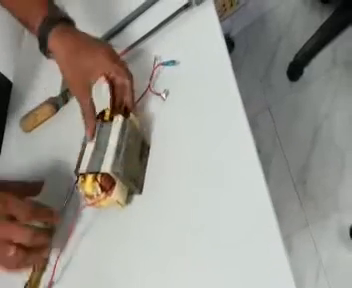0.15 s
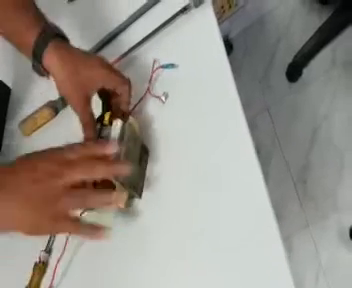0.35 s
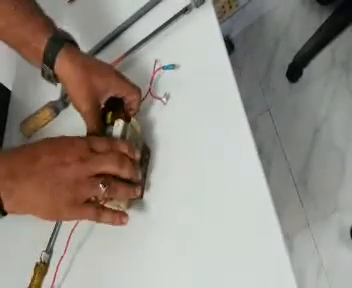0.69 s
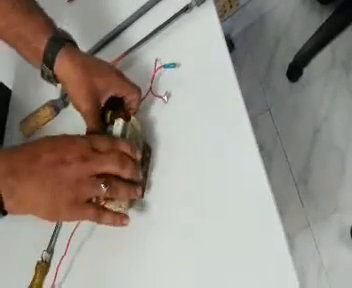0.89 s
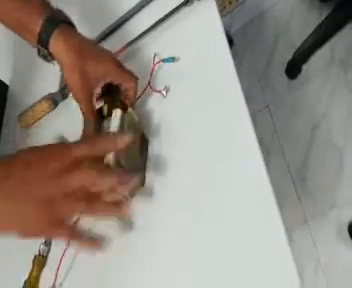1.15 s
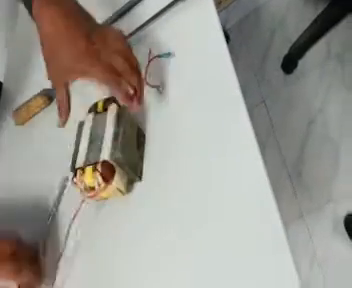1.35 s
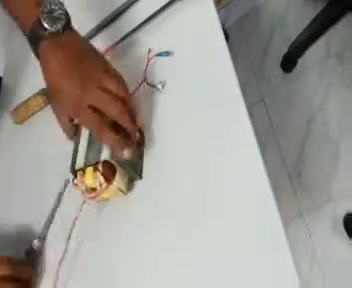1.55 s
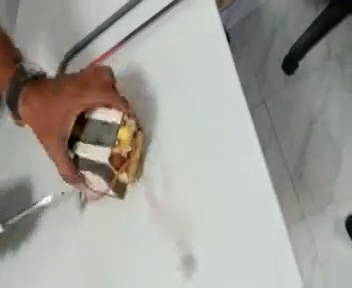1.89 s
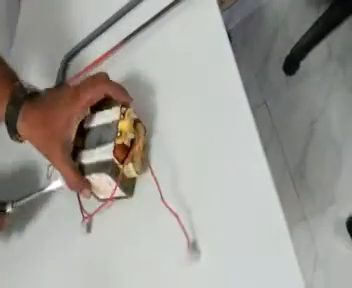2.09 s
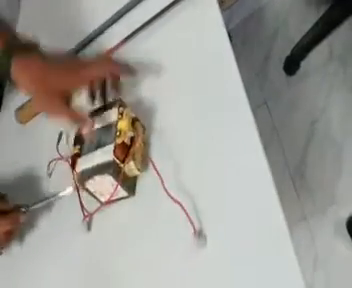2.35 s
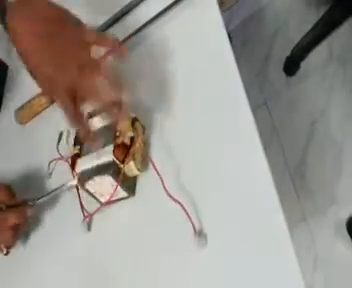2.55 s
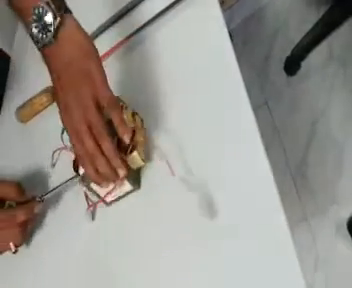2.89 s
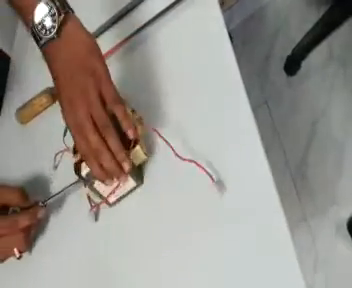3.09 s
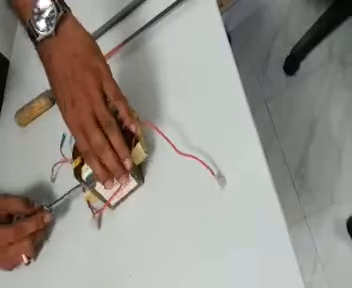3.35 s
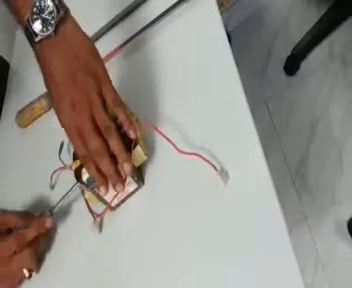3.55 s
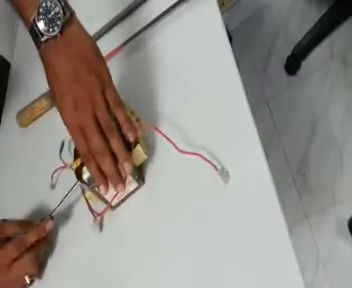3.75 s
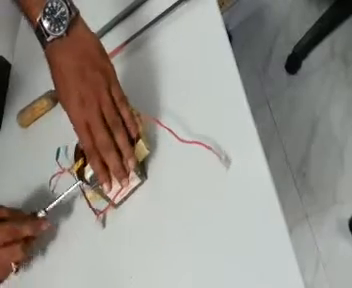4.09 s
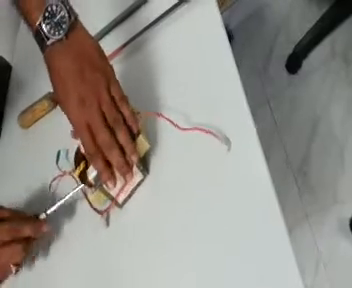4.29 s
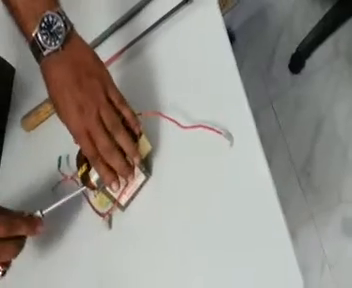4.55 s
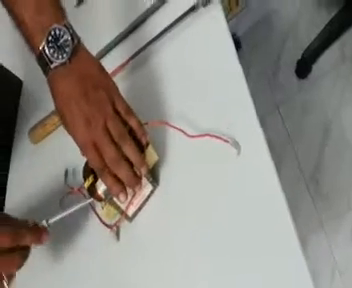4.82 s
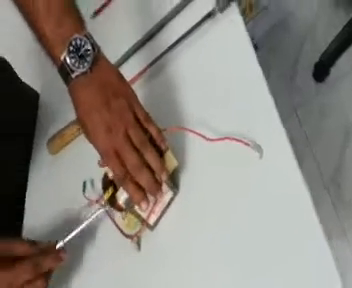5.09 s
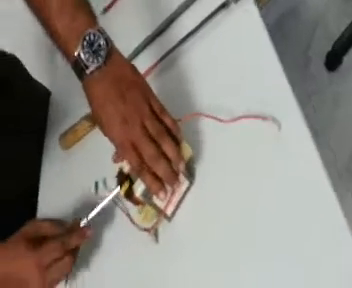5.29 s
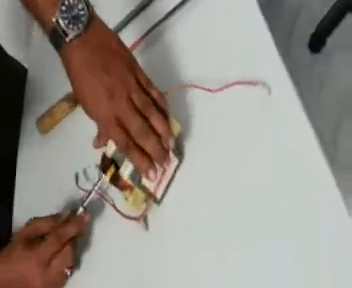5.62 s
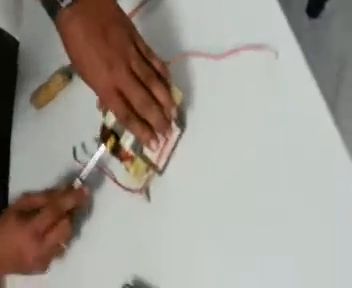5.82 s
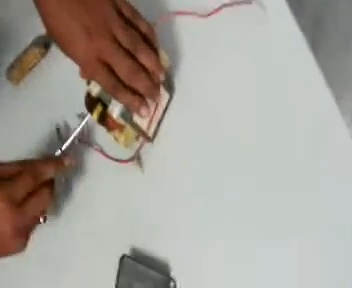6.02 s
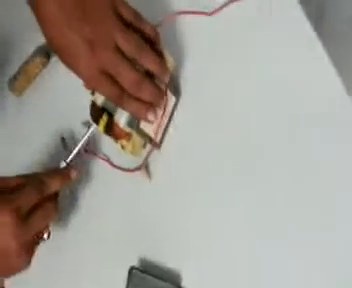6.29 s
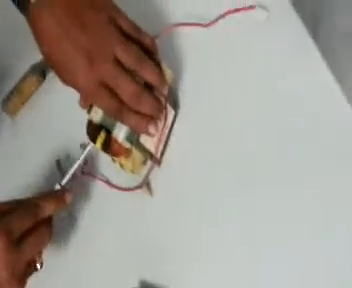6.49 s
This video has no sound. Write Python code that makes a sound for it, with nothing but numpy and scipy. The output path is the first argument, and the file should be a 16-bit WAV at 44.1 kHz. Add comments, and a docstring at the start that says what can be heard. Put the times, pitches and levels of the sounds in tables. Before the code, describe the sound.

A small motor's iron core knocks and scrapes on a hard table while a screwdriver clicks and scratches at its winding, with a harsh overloaded crackle later on.

```python
"""Knocks and drags of a small motor's iron core, shifted, turned and set down on a hard table in a bare room.
A screwdriver picks at its winding: filtered noise and damped modes click, random slips scratch and rustle.
Late on, a finger rubs the microphone case beside the left port, hard enough to overload it.
Short low thumps lie under the loudest overloaded peaks; the shank rings once.
A room tail and steady coloured noise lie behind."""
import sys
import numpy as np
from scipy import signal
from scipy.fft import rfft, irfft, next_fast_len
from scipy.io import wavfile
from scipy.ndimage import uniform_filter1d, minimum_filter1d, map_coordinates

SR = 44100
rng = np.random.default_rng(int(sys.argv[2]) if len(sys.argv) > 2 else 0)


def int16_out(signal):
    """Quantize to a 16-bit WAV file."""
    q = np.round(np.clip(np.atleast_2d(signal).T, -1, 1) * 32767)
    wavfile.write(sys.argv[1], SR, q.astype(np.int16))


N = 293265
BAND_HZ, TOP_HZ = 5450, 16000  # upper edge of the sound's band; end of the output's treble

# Pan in dB: left over right. Event levels are relative within their layer.

# core and hands on the table top: start_s [s], level_db [dB], brightness_hz [Hz]
KNOCK_EVENTS = [(0.092, -19.5, 1660), (0.229, -24, 800), (0.3363, -7, 1120), (0.341, -12.5, 1240),
                (0.348, -12.5, 950), (0.686, -23, 2400), (0.783, -23, 1400), (0.793, -17.5, 1180),
                (0.814, -23.5, 1010), (0.833, -18, 1040), (1.264, -34.5, 1404), (1.369, -22.5, 2900),
                (1.411, -20.5, 900), (1.534, -25, 1520), (1.555, -21, 1630), (1.572, -20, 2330),
                (1.987, -26, 1170), (2.007, -21.5, 835), (2.057, -23.5, 590), (2.138, -14, 1400),
                (2.148, -12.5, 990), (2.154, -13, 726), (2.217, -24.5, 700), (3.888, -27, 580),
                (3.92, -30, 486), (4.148, -27, 600), (4.166, -26, 550), (4.203, -31.5, 600),
                (4.343, -37.5, 600), (4.703, -34, 1000), (5.51, -25.5, 650), (5.56, -39, 420),
                (5.617, -39.5, 423), (5.646, -40, 555), (6.032, -37.5, 1580), (6.354, -23, 2920),
                (6.487, -38, 2040)]
# table-top modes with the core on it: mode_hz [Hz], level_db [dB], t60_s [s]
TABLE_MODES = [(211.6, -36.5, 0.065), (330, -6.5, 0.22), (367.3, -3, 0.19), (512, -12, 0.033),
               (541.7, -5, 0.36), (583, 3.5, 0.13), (707, 2.5, 0.075), (797, 4.5, 0.046), (919, 0.5, 0.1),
               (1035, 5, 0.11), (1240, 4, 0.059), (1544, -3, 0.23)]
# noise of a blow before its brightness filter: freq_hz [Hz], density_db [dB per Hz]
THUD_SPECTRUM = [(40, -50.5), (110, -4), (190, -4.5), (330, -5.5), (560, -3), (1000, -2), (1750, -6),
                 (2800, -14.5), (4200, -30), (5200, -53)]
REBOUND_S, REBOUND_LOSS_DB, REBOUND_BRIGHTNESS_RATIO = .026, 9, 0.58


def knocks():
    """The core rings the table top and rocks back once; soft contacts are dull and deep, hard ones bright and thin."""
    direct, early = np.zeros((2, N)), np.zeros((2, N))
    t = np.arange(SR // 4) / SR
    rebounds = [(start_s + REBOUND_S, level_db - REBOUND_LOSS_DB, bright_hz * REBOUND_BRIGHTNESS_RATIO)
                for start_s, level_db, bright_hz in KNOCK_EVENTS]
    for start_s, level_db, bright_hz in KNOCK_EVENTS + rebounds:
        noise = coloured(rng.standard_normal(len(t)), THUD_SPECTRUM)
        thud = struck(noise * amp(-60 * t / 0.056))
        table = amp(-5.5) * struck(ring(TABLE_MODES, t))
        blow = (table + thud) * (1 - np.exp(-t / 0.00037))
        lowpass = signal.butter(2, min(bright_hz, SR / 3), fs=SR, output="sos")
        blow = signal.sosfilt(lowpass, blow)
        blow = struck(highpassed(blow, cut_hz=140 + 0.13 * bright_hz, order=6))
        add(direct, start_s, amp(level_db - 3.5) * blow * panned(-0.59))
        add(early, start_s, amp(level_db - 3.0) * nearby(blow, t60_s=0.12))
    return direct + early + amp(-8.5) * room(direct)


# pushes on the core or blade:
# start_s [s], length_s [s], drag_db [dB], scratch_db [dB], scratch_pan_db [dB]
PUSH_EVENTS = [(0, 0.038, -17.5, -39.5, 16), (0.092, 0.078, -24, -46, 3), (0.311, 0.046, -17, -28, 14),
               (0.547, 0.075, -36.5, -44.5, 4.5), (0.804, 0.057, -22.5, -72, -3),
               (0.986, 0.072, -33.5, -34, 16), (1.348, 0.025, -35.5, -32.5, 3.5),
               (1.42, 0.077, -25, -43, 6), (1.479, 0.079, -17.5, -25, 17), (1.554, 0.04, -19.5, -23, 18),
               (1.617, 0.11, -34.5, -29.5, 14), (1.73, .11, -45, -30.5, 24), (1.858, 0.41, -36, -48, 5),
               (2.656, 0.13, -37, -33, 7), (3.177, 0.14, -38, -44.5, 4), (3.293, 0.017, -42, -36, -4),
               (3.845, 0.046, -37, -39, 5), (4.038, 0.13, -35.5, -45.5, 5), (4.213, 0.17, -42, -49.5, 5),
               (4.566, 0.21, -48.5, -47.5, 2), (4.969, 0.053, -34, -28.5, 19),
               (5.077, 0.098, -60, -53.5, -16), (5.3, 0.01, -30.5, -30.5, -3),
               (5.506, 0.016, -28.5, -31.5, -7), (5.553, 0.038, -40, -33.5, -1.5),
               (5.676, 0.039, -33, -27, 11), (5.813, 0.23, -54, -39.5, 26), (6.047, 0.33, -51, -53.5, -2),
               (6.354, 0.37, -43, -37, 8)]
# core sliding on the table: freq_hz [Hz], density_db [dB per Hz]
SLIDING_SPECTRUM = [(40, -55.5), (130, -56), (220, -9), (400, -3.5), (560, 3.5), (820, 5.5), (1100, 3),
                    (1500, -1), (2200, -9), (4000, -26), (5000, -68)]
DRAG_RISE_DB_PER_S, DRAG_FALL_DB_PER_S = 256, 301.5


def drag():
    """The core judders over the table top in small slips that stir the top's modes."""
    def board(hz):
        return 1 + sum(amp(mode_db - 2.0) / (1 + ((hz - mode_hz) / 14) ** 2)
                       for mode_hz, mode_db, _ in TABLE_MODES)

    slips = coloured(diffuse(grit(rate_per_s=4000, spread_db=0.5)), SLIDING_SPECTRUM)
    moves = [(start_s, length_s, drag_db) for start_s, length_s, drag_db, *_ in PUSH_EVENTS]
    push = effort(moves, DRAG_RISE_DB_PER_S, DRAG_FALL_DB_PER_S)
    direct = push * amp(0.44 * wobble(62)) * unit(filtered(slips, board))
    return amp(-6) * direct + amp(-11.0) * room(direct)


# sharp contacts on metal; narrow ones ping, wide ones crack, short ones stop dead:
# start_s [s], level_db [dB], pitch_hz [Hz], width_oct [octaves], pan_db [dB], t60_s [s]
CLICK_EVENTS = [(0.0918, -15.5, 3270, 0.34, 11, .014), (0.111, -34, 2890, 0.48, 8, .008),
                (0.121, -23, 2730, 0.47, 14, 0.014), (0.3303, -13, 2430, 0.68, 22, 0.016),
                (0.341, -15, 2510, 1.4, 16, 0.016), (0.3676, -13.5, 3500, 0.34, -2, 0.013),
                (0.684, -19.5, 4230, 2.5, 19.5, 0.0082), (0.689, -21, 1260, 0.53, -1, 0.021),
                (0.782, -25.5, 3200, 0.6, 15, 0.018), (1.264, -33.5, 3390, 1.5, 9, .04),
                (1.3665, -8, 3490, 0.41, 12, .006), (1.368, -12.5, 1260, 0.64, 1, 0.028),
                (1.3726, -13, 2330, 0.56, 7, 0.0079), (1.552, -17, 4190, 0.31, 18, 0.016),
                (1.5615, -9.5, 3390, 0.44, 13, 0.035), (2.013, -35.5, 1530, 1.4, 3, .015),
                (2.033, -41, 1376, 1.4, 1.5, 0.019), (2.1385, -20, 1890, 2.8, 12.5, .02),
                (2.677, -33, 3080, 0.56, 6, .02), (2.9674, -26.5, 3300, 1.6, 13, 0.011),
                (3.2795, -13.5, 4280, 0.3, 14, 0.021), (3.2916, -10.5, 3500, 1.05, 17, 0.0039),
                (3.2955, -25, 2310, 1.34, 1.5, 0.032), (4.274, -20.5, 3990, 0.99, 18, 0.022),
                (4.426, -33, 3210, 1.5, 5, 0.012), (5.048, -16, 3270, 1, 34, .004),
                (5.242, -26.5, 1930, 2.7, 7, 0.0052), (5.309, -2, 2980, 3.62, -10, 0.0045),
                (5.369, -27.5, 2220, 3.9, 12, 0.0072), (5.4822, -22.5, 1600, 1.5, -6.5, 0.0043),
                (6.0334, -21.5, 4100, 1.1, 16, .014), (6.153, -6, 3750, 0.72, 20, 0.012),
                (6.3544, -7.5, 4370, 3, 14, 0.018), (6.3595, -14.5, 4370, 2.7, 15, 0.0026),
                (6.487, -13, 4070, 3.9, 12, .007), (6.492, -21, 3900, 2, 7, 0.017)]
# steel tip and laminations: pitch_ratio [multiple of pitch_hz], level_db [dB], t60_s [s]
STEEL_MODES = [(0.498, -7, 0.047), (0.762, -15, 0.04), (0.954, -0.5, 0.049), (1.095, -7, 0.026),
               (1.299, -3.5, 0.011)]


def clicks():
    """Steel snaps against iron: a crack and a brief ring within the contact's band, then reflections."""
    direct, early = np.zeros((2, N)), np.zeros((2, N))
    t = np.arange(SR // 8) / SR
    attack = 1 - np.exp(-t / .0004)
    for start_s, level_db, pitch_hz, width_oct, pan_db, t60_s in CLICK_EVENTS:
        modes = [(ratio * pitch_hz, mode_db, mode_t60_s) for ratio, mode_db, mode_t60_s in STEEL_MODES]
        band_hz = np.clip(pitch_hz * 2 ** (width_oct * np.array([-.7, .3])), 200, BAND_HZ)
        bandpass = signal.butter(3, band_hz, "band", fs=SR, output="sos")
        envelope = attack * amp(-60 * t / t60_s)

        def contact(x):
            return struck(signal.sosfilt(bandpass, x * envelope))

        crack = contact(rng.standard_normal((2, len(t))))
        # crack noise and mode strengths drawn anew per port
        snap = np.array([struck(port + amp(1.5) * contact(ring(modes, t))) for port in crack])
        add(direct, start_s, amp(level_db - 5.0) * snap * panned(pan_db))
        reflections = nearby(snap[0], t60_s=0.063)
        add(early, start_s, amp(level_db - 10.0) * reflections * panned(pan_db * .5))
    return direct + early + amp(-12.0) * room(direct) * panned(16.0)


# friction on metal: freq_hz [Hz], density_db [dB per Hz]
SCRAPING_SPECTRUM = [(200, -51), (800, -14), (1500, 0), (2300, 0.5), (3300, 0.5), (4000, -5), (4550, -10),
                     (5000, -33), (5300, -61.5)]
SCRATCH_RISE_DB_PER_S, SCRATCH_FALL_DB_PER_S = 346.5, 286.5


def scratch():
    """Fine, dense, bright friction of hands and blade on laminations and wire."""
    moves = [(start_s, length_s, level_db, pan_db)
             for start_s, length_s, _, level_db, pan_db in PUSH_EVENTS]
    push = stereo_effort(moves, SCRATCH_RISE_DB_PER_S, SCRATCH_FALL_DB_PER_S)
    slips = amp(1.0 * wobble(70)) * patchy(grit(rate_per_s=7000, spread_db=0.5), depth_db=2)
    direct = push * coloured(slips, SCRAPING_SPECTRUM)
    return amp(-1.5) * direct + amp(-8.5) * room(direct)


# finger on the microphone case: start_s [s], length_s [s], level_db [dB]
STROKE_EVENTS = [(4.92, 0.0037, -24), (4.955, 0.0031, -17.5), (4.981, 0.029, -12.5), (5.026, 0.018, -8.5),
                 (5.075, 0.041, -25), (5.13, 0.23, -28.5), (5.283, 0.017, -31), (5.309, 0.02, 2.5),
                 (5.352, 0.011, -5), (5.366, 0.047, -7.5), (5.435, 0.012, -22.5), (5.68, 0.011, -26),
                 (5.696, 0.076, -7), (5.712, 0.03, -2.5), (5.799, 0.004, -12.5), (5.89, 0.038, -37),
                 (5.99, 0.026, -25.5)]
# rubbed case: freq_hz [Hz], density_db [dB per Hz]
CASE_SPECTRUM = [(40, -45.5), (500, -57), (950, -23), (1450, -6), (2000, -5), (2700, -3.5), (3400, 1.5),
                 (4300, -1), (5050, -8), (5500, -23.5)]
# hollows of the case around the port: centre_hz [Hz], width_hz [Hz], boost_db [dB]
CASE_HOLLOWS = [(1660, 250, 0), (2595, 1000, 7), (2780, 70, 2), (3580, 64, 5.5), (4700, 200, 1.5)]
STROKE_RISE_DB_PER_S, STROKE_FALL_DB_PER_S = 601, 854
GRIP_DB = 7.5  # jump in level as the skin catches
# SLIP_SCATTER in natural log; the level falls by SLIP_FALL_DB between slips
SLIPS_PER_S, SLIP_SCATTER, SLIP_FALL_DB = 165, .3, 8


def rub():
    """Skin sticks and slips on the case beside the left port; the right one barely hears it."""
    def hollows(hz):
        return amp(sum(boost_db / (1 + (2 * (hz - centre_hz) / width_hz) ** 2)
                       for centre_hz, width_hz, boost_db in CASE_HOLLOWS))

    slip_rate = SLIPS_PER_S * np.exp(SLIP_SCATTER * wobble(90))
    cycle = np.cumsum(slip_rate) / SR % 1
    slips = grit(rate_per_s=14000, spread_db=.5) * amp(-SLIP_FALL_DB * cycle) * panned(31)
    # the shifting contact favours ever different bands
    slips = patchy(slips, depth_db=2.5)
    skin = unit(filtered(coloured(slips, CASE_SPECTRUM), hollows))
    stroke = effort(STROKE_EVENTS, STROKE_RISE_DB_PER_S, STROKE_FALL_DB_PER_S, GRIP_DB)
    return amp(-5.0) * stroke * skin


# freed shank, settled pitch: mode_hz [Hz], level_db [dB], t60_s [s]
SHANK_MODES = [(1675, 1, 0.073), (1860, -7, 0.08), (2229, -8, 0.13), (3203, -14, .07), (4000, -0.5, .07),
               (4447, -8.5, .1), (5340, -5, 0.075)]
SLIP_S, SLIP_DB = 6.153, -20
# pitch starts high by this share, then settles as the tip comes free
SHANK_SAG_RATIO, SHANK_SETTLE_S = 0.107, 0.011


def shank():
    """The tip slips off and the freed shank rings briefly, sinking in pitch and chattering in the hand."""
    track = np.zeros((2, N))
    t = np.arange(SR // 4) / SR
    settling_t = t + SHANK_SAG_RATIO * SHANK_SETTLE_S * (1 - np.exp(-t / SHANK_SETTLE_S))
    chatter = amp(3 * wobble(260)[:len(t)])
    add(track, SLIP_S, amp(SLIP_DB) * ring(SHANK_MODES, settling_t) * chatter * panned(11.0))
    return track + amp(-11) * room(track)


# wires and insulation brushed by the blade: start_s [s], length_s [s], level_db [dB], pan_db [dB]
RUSTLE_EVENTS = [(0.975, 0.012, -40.5, 19), (1.757, .08, -35, 17), (2.569, .008, -48, 2.5),
                 (3.853, .01, -53, 7), (4.214, 0.017, -38.5, 11), (4.245, 0.065, -40, 4),
                 (4.437, 0.02, -43.5, 6), (4.574, 0.0076, -41, 6), (4.608, 0.011, -35, 15),
                 (4.652, 0.0052, -40.5, 12), (4.772, 0.013, -35, 23), (5.25, .045, -27.5, 16),
                 (5.29, .01, -26, 6), (6.159, 0.0089, -27, 10.5)]
# crinkling wire: freq_hz [Hz], density_db [dB per Hz]
WIRE_SPECTRUM = [(300, -47), (1100, -19.5), (1800, 1.5), (2600, 2), (3600, 8.5), (4500, 6.5), (5400, -17.5)]
RUSTLE_RISE_DB_PER_S, RUSTLE_FALL_DB_PER_S = 908, 610.5


def rustle():
    """Loose wires and insulation crinkle softly under the blade in sparse random slips."""
    touch = stereo_effort(RUSTLE_EVENTS, RUSTLE_RISE_DB_PER_S, RUSTLE_FALL_DB_PER_S)
    crinkles = patchy(grit(rate_per_s=1500, spread_db=2), depth_db=3.5)
    direct = touch * coloured(crinkles, WIRE_SPECTRUM)
    return amp(1.0) * direct + amp(-17.5) * room(direct)


# short low thumps under the loudest overloaded peaks: start_s [s], level_db [dB]
THUMP_EVENTS = [(5.31, -25), (5.365, -43), (6.356, -41.5)]
# thump noise: freq_hz [Hz], density_db [dB per Hz]
THUMP_SPECTRUM = [(30, -17), (90, -3), (200, -5), (400, 6), (900, -10), (2000, -67)]
THUMP_T60_S = 0.074


def low_thumps():
    """Short low thumps under the loudest overloaded peaks: decaying low noise at both ports."""
    track = np.zeros((2, N))
    t = np.arange(SR // 8) / SR
    envelope = amp(-60 * t / THUMP_T60_S) * (1 - np.exp(-t / 0.00051))
    for start_s, level_db in THUMP_EVENTS:
        thump = struck(coloured(rng.standard_normal(len(t)), THUMP_SPECTRUM) * envelope)
        add(track, start_s, amp(level_db) * thump * panned(3.7))
    return track


# t60 of the bare room: freq_hz [Hz], t60_s [s]
ROOM_DECAY = [(150, 1.6), (400, 1.405), (1000, 0.89), (2800, 0.31), (4100, 0.36), (5000, 0.28)]


def room(x):
    """The bare room's tail, excited by the left channel; treble dies sooner than bass."""
    hz, s, z = signal.stft(diffuse(rng.standard_normal((2, SR))), SR, nperseg=256)
    decay = amp(-60 * s / along(ROOM_DECAY, hz)[:, None])
    tail = signal.istft(z * decay, SR, nperseg=256)[1][:, :SR]
    onset = 1 - np.exp(-np.arange(SR) / SR / 0.0013)
    tail = unit(tail * onset) / np.sqrt(SR)
    return signal.fftconvolve(x[:1], tail, axes=1)[:, :N]


def nearby(x, t60_s):
    """Quick reflections of one hit from the table, hands and tools, as decaying diffuse noise."""
    t = np.arange(len(x)) / SR
    envelope = amp(-60 * t / t60_s) * (1 - np.exp(-t / 0.0026))
    echo = diffuse(rng.standard_normal((2, len(x)))) * envelope
    return signal.fftconvolve(x[None], unit(echo), axes=1)[:, :len(x)] / np.sqrt(len(x))


# rush and hiss: freq_hz [Hz], density_db [dB per Hz]
AIR_SPECTRUM = [(30, -44.5), (90, -33), (140, -13), (230, -6.5), (450, 1), (1000, -2), (1500, -1),
                (2200, -8.5), (3000, -5.5), (3800, -2.5), (4350, -14), (4800, -43.5)]


def air():
    """The room's steady rush and the microphones' hiss: coloured noise, slightly unsteady in level."""
    hiss = coloured(diffuse(rng.standard_normal((2, N))), AIR_SPECTRUM)
    return amp(-47.0 + 1.0 * wobble(26)) * hiss * panned(0.7)


# diffuse field at the two ports: freq_hz [Hz], likeness [correlation, 0 to 1]
PORT_LIKENESS = [(100, 1), (400, 0.67), (750, 0.5), (1400, 0.068), (2600, 0.18)]


def diffuse(pair):
    """Two unrelated signals as a room field: most alike at both ports in the bass."""
    def mid_side(hz):
        angle = np.arccos(np.clip(along(PORT_LIKENESS, hz), -1, 1)) / 2
        return np.array([np.cos(angle), np.sin(angle)])

    mid, side = filtered(pair, mid_side)
    return np.array([mid + side, mid - side])


def grit(rate_per_s, spread_db):
    """Two trains of tiny slips of random size at random times."""
    slips = rng.random((2, N)) < rate_per_s / SR
    sizes = rng.standard_normal((2, N)) * amp(spread_db * rng.standard_normal((2, N)))
    return unit(slips * sizes)


def ring(modes, t):
    """Damped modes with random phases, at slightly new strengths for every blow."""
    strengths = amp(rng.normal(0, 2, len(modes)))
    return sum(gain * amp(level_db - 60 * t / t60_s) * np.sin(2 * np.pi * (mode_hz * t + rng.random()))
               for gain, (mode_hz, level_db, t60_s) in zip(strengths, modes))


def effort(moves, rise_db_per_s, fall_db_per_s, grip_db=0):
    """Gain per sample of (start_s, length_s, level_db) moves: swell, jump by grip_db, hold, die away."""
    t = np.arange(N) / SR
    power = np.zeros(N)
    for start_s, length_s, level_db in moves:
        drop_db = grip_db * (t < start_s)
        drop_db = drop_db + rise_db_per_s * np.maximum(start_s - t, 0)
        drop_db = drop_db + fall_db_per_s * np.maximum(t - start_s - length_s, 0)
        heard = drop_db < 80
        power[heard] += amp(level_db - drop_db[heard]) ** 2
    return np.sqrt(power)


def stereo_effort(moves, rise_db_per_s, fall_db_per_s):
    """Left and right gains of (start_s, length_s, level_db, pan_db) moves."""
    left = [(start_s, length_s, level_db) for start_s, length_s, level_db, _ in moves]
    right = [(start_s, length_s, level_db - pan_db) for start_s, length_s, level_db, pan_db in moves]
    return np.array([effort(side, rise_db_per_s, fall_db_per_s) for side in (left, right)])


def patchy(x, depth_db):
    """x with bands that swell and sink at random, some 130 Hz wide and 35 ms long."""
    z = signal.stft(x, nperseg=1024)[2]
    field = rng.standard_normal(z.shape[1:])
    field = uniform_filter1d(uniform_filter1d(field, size=3, axis=0), size=3, axis=1)
    return signal.istft(z * amp(depth_db * unit(field)), nperseg=1024)[1][:, :N]


def amp(db):
    """Gain of a level in dB."""
    return 10 ** (np.asarray(db) / 20)


def unit(x):
    """x at rms 1."""
    return x / np.sqrt(np.mean(x ** 2) + 1e-20)


def struck(x):
    """x at rms 1 over its first 8 ms."""
    return x / np.sqrt(np.mean(x[..., :round(.008 * SR)] ** 2))


def along(points, hz):
    """(freq_hz, value) points interpolated on a log frequency axis."""
    freq_hz, values = np.transpose(points)
    return np.interp(np.log(hz + 1), np.log(freq_hz + 1), values)


def wobble(knots_per_s):
    """A smooth random curve through normal random knots."""
    knots = rng.standard_normal(int(N * knots_per_s / SR) + 4)
    return map_coordinates(knots, [np.arange(N) * knots_per_s / SR])


def filtered(x, response):
    """x times a response of frequency."""
    n = x.shape[-1]
    m = next_fast_len(n + 4096)
    return irfft(rfft(x, m) * response(np.fft.rfftfreq(m, 1 / SR)), m)[..., :n]


def coloured(x, spectrum):
    """x shaped by a spectrum, at rms 1."""
    return unit(filtered(x, lambda hz: amp(along(spectrum, hz))))


def highpassed(x, cut_hz, order):
    """x without its bass, starting no earlier than x."""
    return signal.sosfilt(signal.butter(order, cut_hz, "high", fs=SR, output="sos"), x)


def panned(db):
    """Left and right gains; the left port is the reference."""
    return amp([[0], [-db]])


def add(track, start_s, x):
    """Mix x into the track at start_s."""
    part = track[:, max(round(start_s * SR), 0):][:, :x.shape[1]]
    part += x[:, :part.shape[1]]


def limited(x, ceiling_db):
    """Each channel's gain ducks around its peaks to hold them at the ceiling."""
    hold = round(.002 * SR)
    needed = np.minimum(1, amp(ceiling_db) / (np.abs(x) + 1e-9))
    return x * uniform_filter1d(minimum_filter1d(needed, hold), hold)


def scene():
    """Everything at the two ports."""
    handling = knocks() + drag() + clicks() + scratch()
    return handling + rub() + shank() + rustle() + low_thumps() + air()


CLIP_DB, CLIP_KNEE = 0, 30  # a higher knee clips more sharply


def record(dry):
    thin = highpassed(dry, cut_hz=25, order=4)
    narrow = filtered(thin, lambda hz: 1 / np.sqrt(1 + (hz / BAND_HZ) ** 90))
    held = limited(narrow, ceiling_db=2.0)
    clipped = held / (1 + np.abs(held / amp(CLIP_DB)) ** CLIP_KNEE) ** (1 / CLIP_KNEE)
    return filtered(clipped, lambda hz: np.clip((TOP_HZ - hz) / 600, 0, 1))


dry = scene()
out = record(dry)
int16_out(out)
```